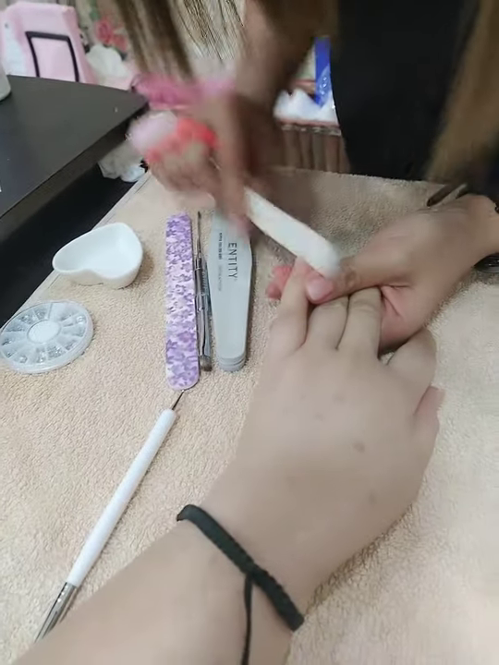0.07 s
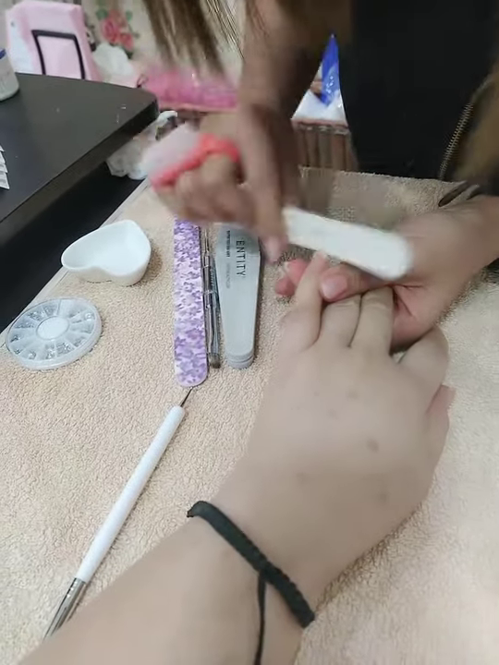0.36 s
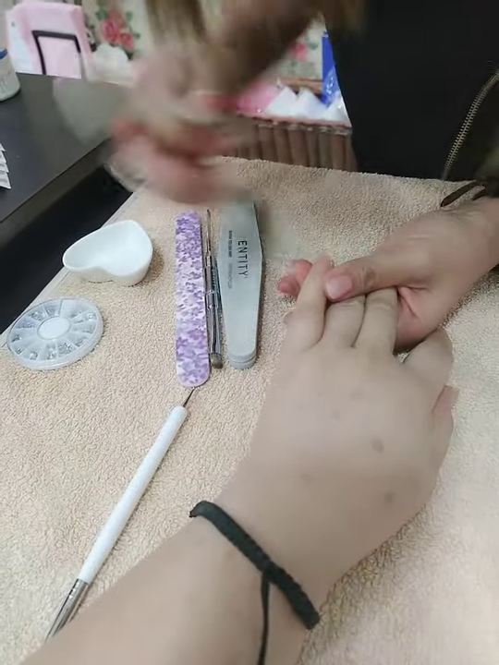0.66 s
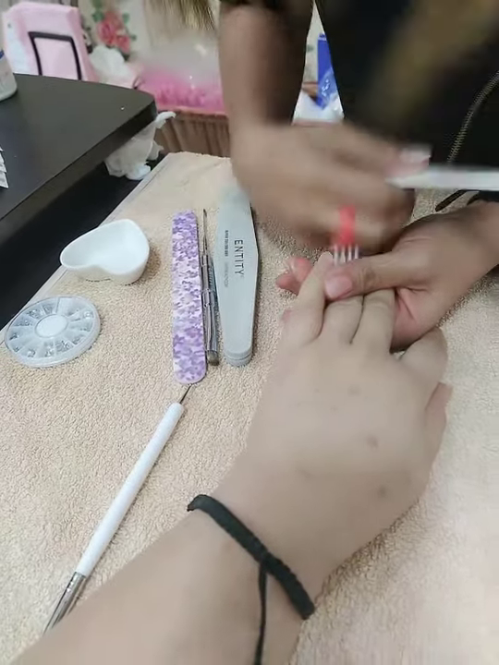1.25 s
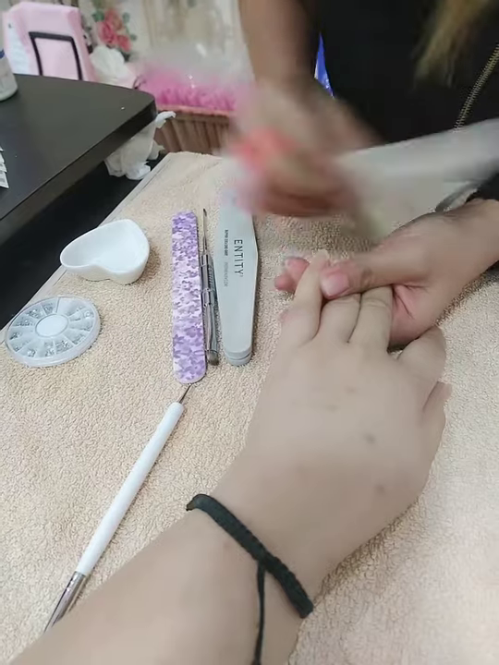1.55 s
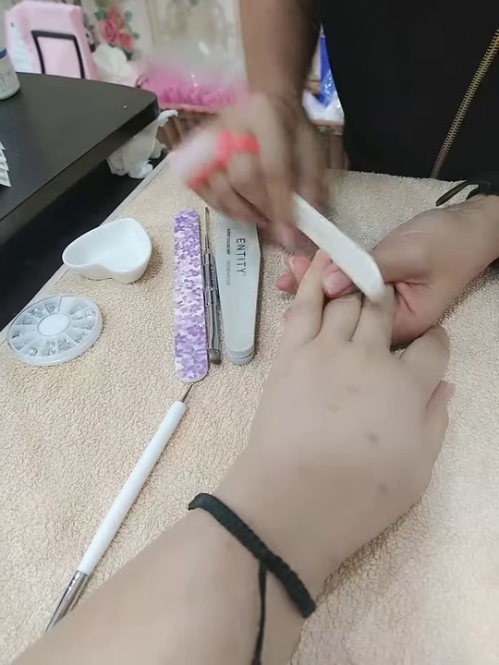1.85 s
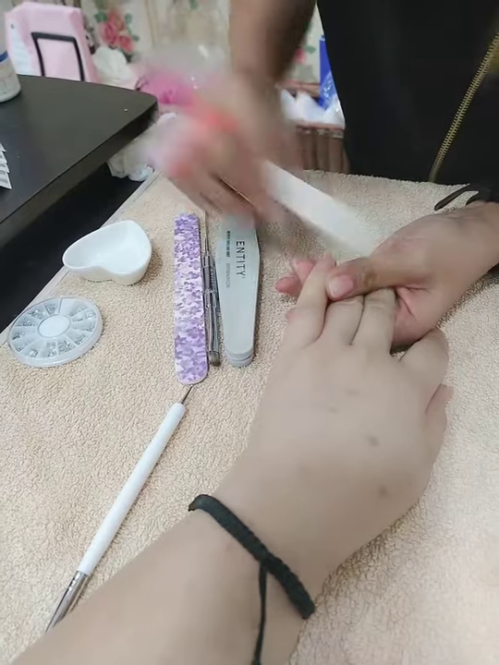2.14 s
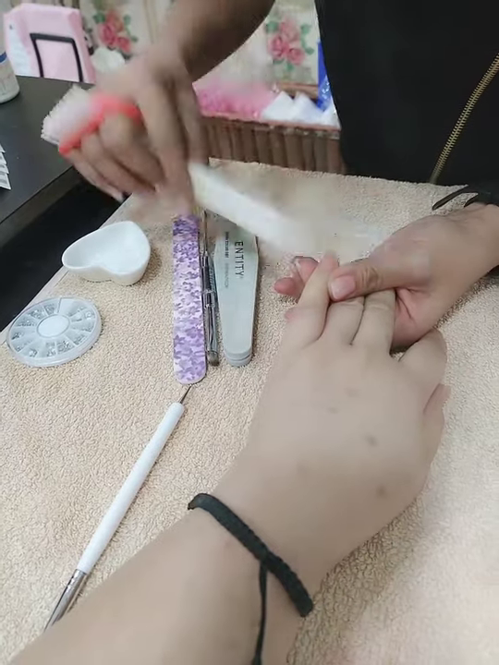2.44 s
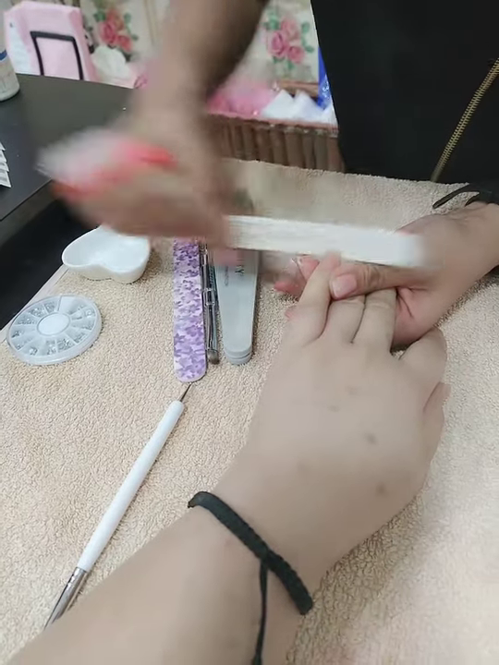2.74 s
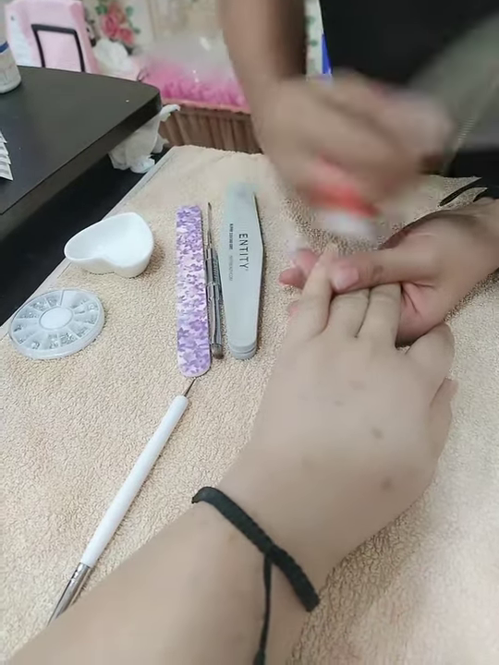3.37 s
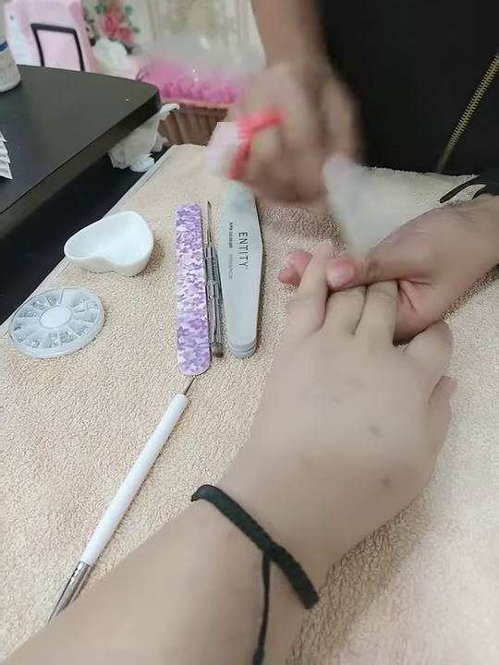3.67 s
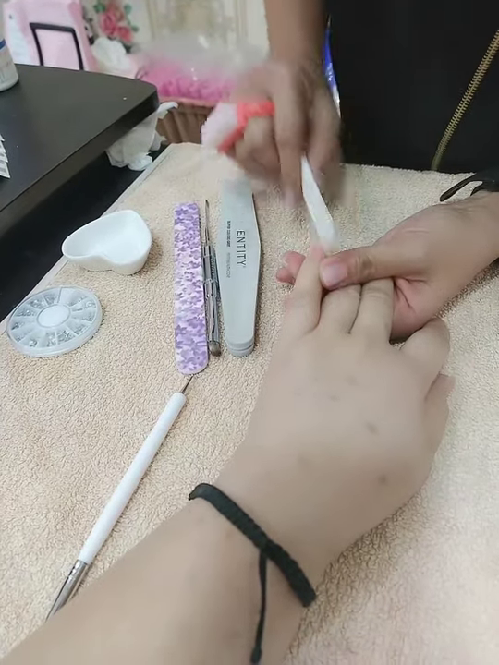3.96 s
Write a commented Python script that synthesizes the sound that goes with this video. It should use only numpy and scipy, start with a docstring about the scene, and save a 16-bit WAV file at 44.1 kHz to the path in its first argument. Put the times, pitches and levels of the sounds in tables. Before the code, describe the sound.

A nail file rasps across a fingernail in single strokes, close by. A small brush flicks quickly over the nail, then filing and brushing alternate again with tiny ticks. A fan hums steadily in the small room.

```python
"""A small room with a humming fan, where a manicure goes on at a towel-covered table.
An abrasive file crosses a fingernail in single strokes; between them a small brush flicks the dust away
and grazes the nail on its way back. Both sound by stick-slip friction, a dense train of tiny snaps.
The tools tick against the nail's edge, and the room adds a short tail to them. The hand bumps once,
and a faint whistle passes in the background."""
import sys
import numpy as np
from scipy import signal
from scipy.fft import rfft, irfft
from scipy.io import wavfile

SR = 44100
rng = np.random.default_rng(int(sys.argv[2]) if len(sys.argv) > 2 else 0)


def file_out(sig):
    """Save sig as 16-bit WAV at sys.argv[1]."""
    # one column per channel
    cols = np.atleast_2d(sig).T
    # limit, then scale
    lim = np.clip(cols, -1, 1)
    pcm = np.round(lim * 32767).astype(np.int16)
    wavfile.write(sys.argv[1], SR, pcm)


N = 176400
CUTOFF_HZ = 15780

# Spectrum of the brush and the ticks on the nail. Each row: frequency in Hz, relative level in dB.
BRUSH_SPECTRUM = [(1200, -15.5), (1800, -19), (2250, -11), (2800, -17.5), (3250, -13), (3800, -24.5),
                  (4600, -22), (5700, -18.5), (6500, -10.5), (6900, -13.5), (7500, -11), (9000, -6.5),
                  (10200, -6.5), (10700, -7), (11150, -6), (11600, -9.5), (12400, -5), (12950, -1),
                  (13350, -2), (13850, -4), (14450, 1), (14850, 0.5), (15400, -12)]


def nail_file():
    """Stick-slip friction: abrasive grit catches on the nail and lets go."""
    # Each row: start, length, rise and fall in seconds, level in dB, bite (low-treble lift) in dB.
    strokes = [(.038, 0.16, 0.034, 0.0071, -49, 5), (.452, 0.19, 0.067, 0.072, -50.5, 4),
               (1.846, 0.2, 0.11, 0.0061, -50, 5), (2.341, 0.19, 0.048, 0.029, -51.5, 4),
               (2.752, 0.17, 0.12, 0.031, -48, 5), (3.905, .17, 0.098, .02, -53, 8.5)]
    # Spectrum of the file on the nail. Each row: frequency in Hz, relative level in dB.
    spectrum = [(1200, -14.5), (1750, -18.5), (2250, -15), (3200, -19.5), (4100, -23.5), (5200, -29),
                (5700, -24), (6600, -18.5), (7800, -18.5), (8900, -7), (10800, -5.5), (11500, -8.5),
                (12350, -10), (13000, -2), (13500, -2.5), (14050, -0.5), (14400, -2), (14700, 1.5),
                (15200, -9), (15700, -1.5)]
    return friction(strokes, spectrum, snaps_per_s=12000, spread_db=3, chatter_db=1.5)


def brush():
    """Stick-slip friction of bristles: firm flicks, and lighter grazes on the way back."""
    # Each row of both: start, length, rise and fall in seconds, level in dB, bite in dB.
    flicks = [(.849, 0.1, 0.037, 0.028, -52, -2.5), (.955, .099, 0.077, .007, -47, 2),
              (1.237, 0.089, 0.042, 0.03, -47, 2.5), (1.44, 0.1, 0.086, .024, -46.5, 4),
              (3.138, 0.12, 0.09, 0.053, -47, 1.5), (3.283, 0.076, .022, 0.0087, -48.5, 3.5),
              (3.503, 0.1, 0.052, 0.046, -46.5, 3.5)]
    grazes = [(.712, 0.045, 0.011, 0.035, -60, 1), (.755, 0.045, 0.023, .012, -63, 6),
              (1.157, 0.029, 0.01, 0.021, -55, 4), (1.385, 0.039, .007, 0.033, -52.5, -2),
              (3.025, 0.059, 0.041, 0.024, -60.5, 1), (3.405, 0.045, .012, .018, -60.5, -3)]
    # Spectrum of a light touch. Each row: frequency in Hz, relative level in dB.
    graze_spectrum = [(2000, -37), (5000, -24), (7300, -11.5), (8400, 2), (9400, 4), (11300, -4),
                      (12600, 0), (13700, 6), (15800, 1)]
    bristles = dict(snaps_per_s=10000, spread_db=3.5, chatter_db=1)
    return friction(flicks, BRUSH_SPECTRUM, **bristles) + friction(grazes, graze_spectrum, **bristles)


def friction(strokes, spectrum, snaps_per_s, spread_db, chatter_db):
    """Shot noise: random snaps merge into a rasp that follows the pressure and brightens over a stroke."""
    snaps = (rng.random(N) < snaps_per_s / SR) * rng.choice([-1., 1.], N)
    strength_db = spread_db * np.minimum(rng.exponential(1, N), 4)
    snaps *= amp(strength_db + chatter_db * wander(145))
    t, out = np.arange(SR // 4) / SR, np.zeros(N)
    for start, length, rise, fall, level_db, bite_db in strokes:
        pressure = (np.clip(t / rise, 0, 1) * np.clip((length - t) / fall, 0, 1)) ** 0.77
        grit = np.take(snaps, round(start * SR) + np.arange(len(t)), mode="wrap")
        dull = colour(grit, spectrum, bite_db, top_db=-0.75)
        bright = colour(grit, spectrum, bite_db, top_db=0.75)
        add(out, start, amp(level_db) * pressure * (dull + (bright - dull) * t / length))
    return out


def edge_ticks():
    """Damped impact: a tool catches the nail's edge, and the finger absorbs the vibration at once."""
    # Each row: start in seconds, level in dB, bite in dB.
    contacts = [(.436, -57, 7), (.616, -44, 6), (1.44, -51, 17), (1.675, -59, 14), (2.734, -54.5, 3),
                (2.738, -54, 3), (3.014, -49, 3), (3.143, -46.5, 5), (3.148, -44, 6), (3.481, -50, 12)]
    rise_s, decay_s = 0.001, 0.0029
    t, out = np.arange(SR // 25) / SR, np.zeros(N)
    for start, level_db, bite_db in contacts:
        envelope = np.minimum(t / rise_s, 1) * np.exp(-t / decay_s)
        burst = colour(rng.standard_normal(len(t)), BRUSH_SPECTRUM, bite_db)
        add(out, start, amp(level_db) * envelope * burst)
    return out


def hand_bump():
    """Cushioned impact: the hand's padded thud is one low mode that builds and dies away."""
    # Each row: start in seconds, pitch in Hz, peak level in dB, decay (two time constants) in seconds.
    bumps = [(1.005, 212, -41, .06)]
    t, out = np.arange(SR // 2) / SR, np.zeros(N)
    for start, hz, level_db, decay in bumps:
        envelope = (2 * t / decay) * np.exp(1 - 2 * t / decay)
        add(out, start, amp(level_db) * envelope * np.sin(2 * np.pi * hz * t))
    return out


def room(x):
    """Reverberation: diffuse reflections follow a short gap, and the high treble dies first."""
    # Each row: frequency in Hz, time to decay by 60 dB in seconds.
    t60 = [(300, 0.49), (4000, 0.56), (9000, 0.41), (15000, 0.37)]
    gap_s = 0.0098
    hz, t, noise = signal.stft(rng.standard_normal(SR // 2), SR, nperseg=256)
    tail = signal.istft(noise * amp(-60 * t / read(t60, hz)[:, None]), SR, nperseg=256)[1]
    tail *= np.arange(len(tail)) / SR > gap_s
    return signal.fftconvolve(x, tail / np.linalg.norm(tail))[:N]


def fan():
    """Tonal and broadband noise: the fan's low tones waver in a steady rush of air."""
    # Each row: frequency in Hz, rms level in dB.
    tones = [(98.6, -51.5), (108.5, -54), (166, -57.5), (194.3, -58.5), (235.5, -56), (272, -61.5),
             (291, -61), (300, -62), (441, -69), (785, -73)]
    # Each row: frequency in Hz, relative level in dB.
    air_spectrum = [(15, -8.5), (36, -4.5), (58, -5), (82, -13), (130, -6.5), (175, -3.5), (240, -5.5),
                    (295, -11), (330, -14), (430, -13), (620, -20), (820, -19.5), (1200, -24), (1750, -34),
                    (2600, -37), (3800, -40.5), (4600, -47.5), (6500, -47.5), (9000, -45.5), (12000, -51.5),
                    (15000, -43)]
    air_db, flutter_db = -48, 0.5
    waver_hz, waver_db, drift_hz = 5.02, 3, 1.236
    out = amp(air_db + flutter_db * wander(waver_hz)) * colour(rng.standard_normal(N), air_spectrum)
    for hz, level_db in tones:
        cycles = np.cumsum(hz + drift_hz * wander(waver_hz)) / SR + rng.random()
        waver = amp(waver_db * wander(waver_hz))
        out += amp(level_db) * unit(waver * np.sin(2 * np.pi * cycles))
    return out


def whistle():
    """Random frequency modulation blurs a faint, thin tone that swells and fades once."""
    start_s, length_s = 2.02, 0.33
    pitch_hz, width_hz, level_db = 3760, 68, -79
    t = np.arange(N) / SR
    swell = np.sin(np.pi * np.clip((t - start_s) / length_s, 0, 1)) ** 0.5
    cycles = np.cumsum(pitch_hz + width_hz * wander(2 * width_hz)) / SR
    return amp(level_db) * swell * unit(np.sin(2 * np.pi * cycles))


def colour(x, spectrum, bite_db=0, top_db=0):
    """Source-filter shaping: x takes on a spectrum and the nail's narrow resonance, at rms 1."""
    bite_hz, top_hz = 6600, 11600
    ring_hz, ring_width_hz, ring_db = 13900, 220, 1.5
    hz = np.fft.rfftfreq(len(x), 1 / SR)
    bite = bite_db * np.exp(-(2 * np.log2((hz + 1) / bite_hz)) ** 2)  # about an octave wide
    ring = ring_db * np.exp(-((hz - ring_hz) / ring_width_hz) ** 2)
    shelf = top_db / (1 + (top_hz / (hz + 1)) ** 10)
    gain = amp(read(spectrum, hz) + bite + ring + shelf) * (hz < CUTOFF_HZ)
    return unit(irfft(rfft(x) * gain, len(x)))


def wander(rate_hz):
    """Low-passed noise: a smooth random fluctuation of rms 1."""
    hz = np.fft.rfftfreq(N, 1 / SR)
    return unit(irfft(rfft(rng.standard_normal(N)) * (hz > 0) / (1 + (hz / rate_hz) ** 4), N))


def amp(db):
    """Decibels to amplitude ratio."""
    return 10 ** (np.asarray(db) / 20)


def unit(x):
    """Normalisation to rms 1."""
    return x / np.sqrt(np.mean(x ** 2) + 1e-20)


def read(points, hz):
    """Interpolation on a log-frequency axis."""
    f, value = np.transpose(points)
    return np.interp(np.log(hz + 1), np.log(f + 1), value)


def add(mix, start_s, sound):
    """Superposition of a sound on the mix from start_s on."""
    part = mix[max(round(start_s * SR), 0):][:len(sound)]
    part += sound[:len(part)]


def scene():
    """Superposition: the tools close by, their reverberation, the hand, the fan and the whistle."""
    tools = nail_file() + brush() + edge_ticks()
    return (tools + amp(-13.5) * room(tools) + hand_bump() + whistle() + fan())[None]


def record(dry):
    """Band limiting: a steep low-pass removes the treble above CUTOFF_HZ."""
    lowpass = signal.firwin(801, CUTOFF_HZ, window=("kaiser", 8), fs=SR)
    return signal.oaconvolve(dry, lowpass[None], "same")


dry = scene()
out = record(dry)
file_out(out)
```